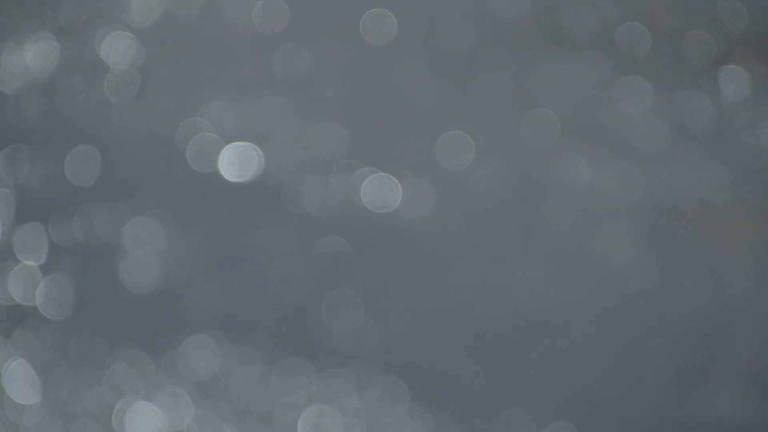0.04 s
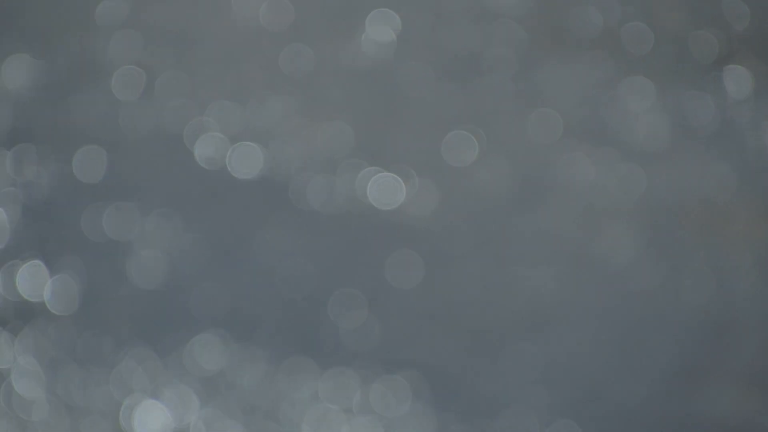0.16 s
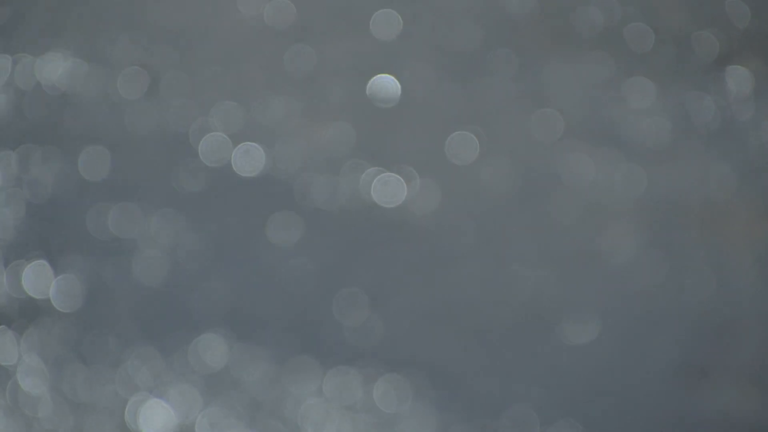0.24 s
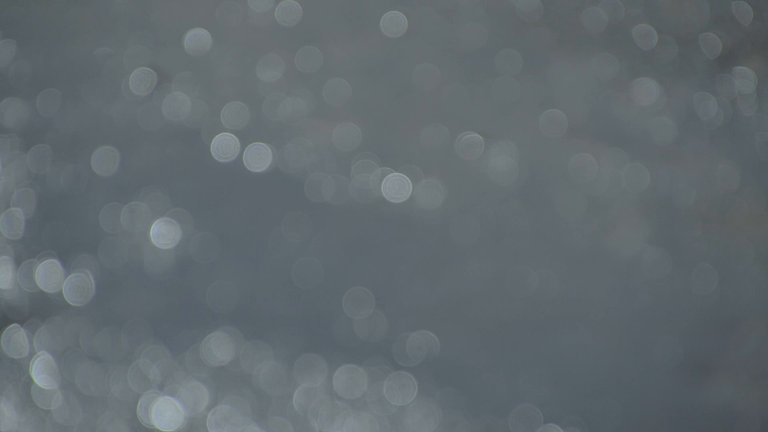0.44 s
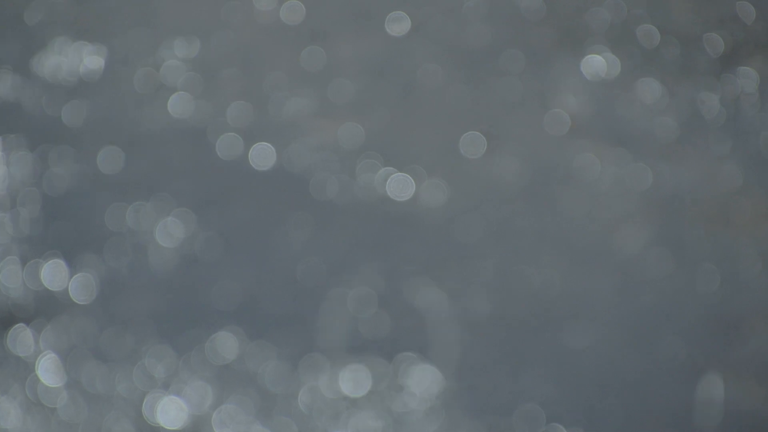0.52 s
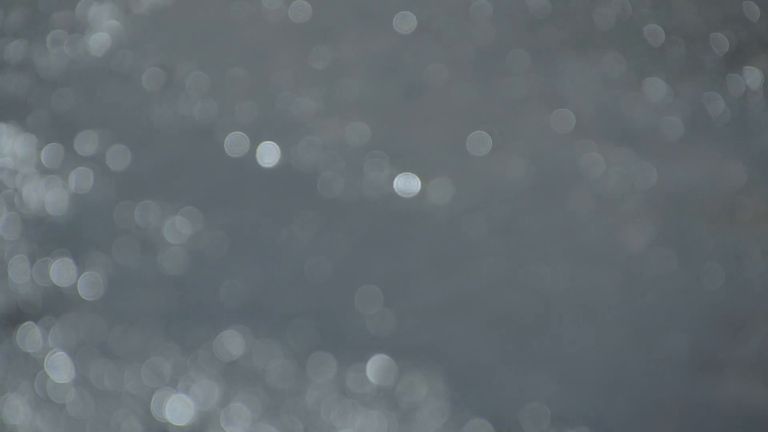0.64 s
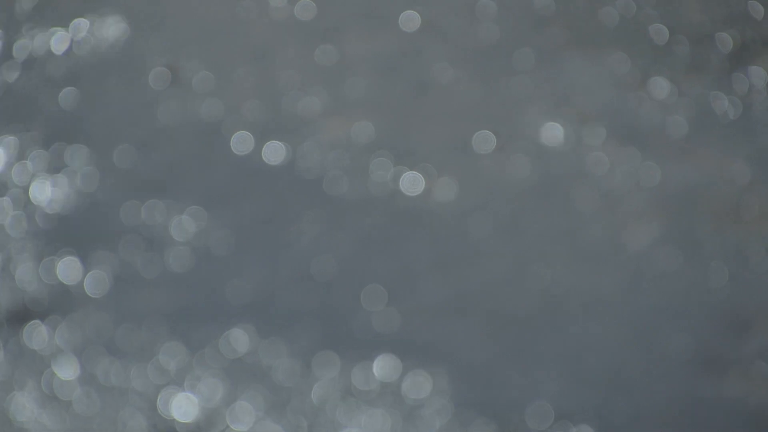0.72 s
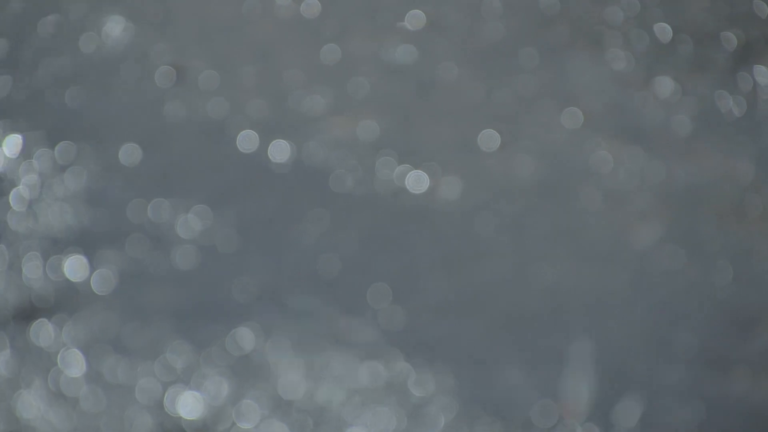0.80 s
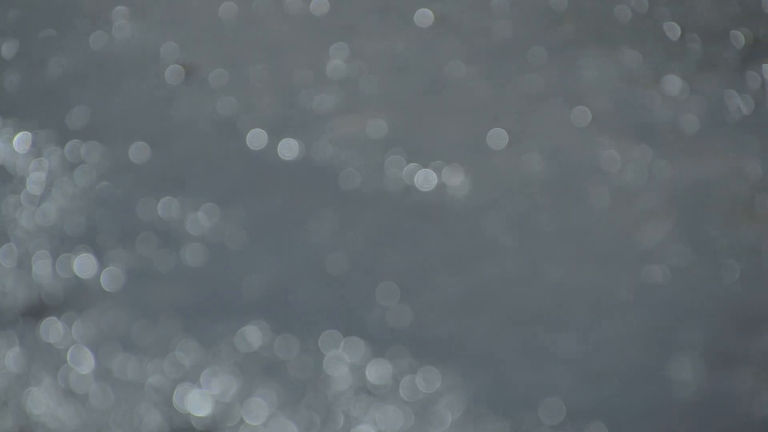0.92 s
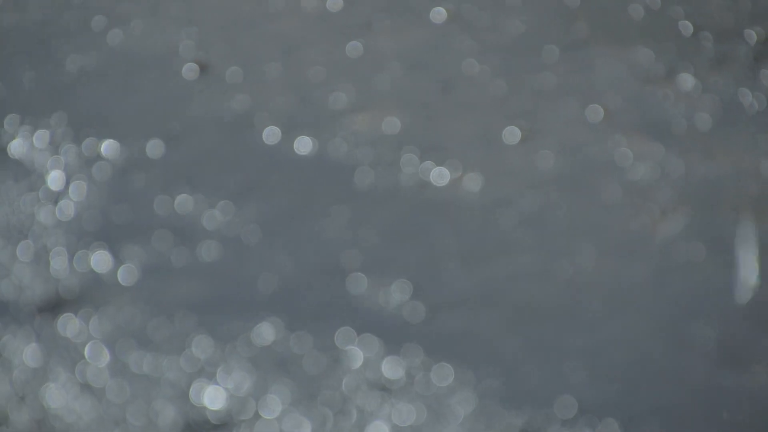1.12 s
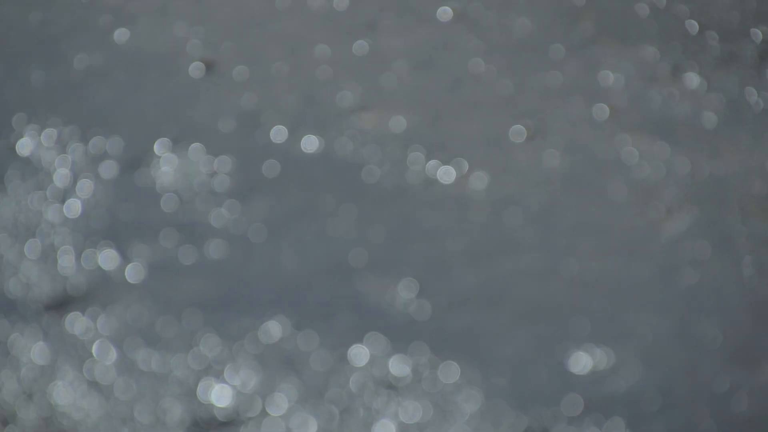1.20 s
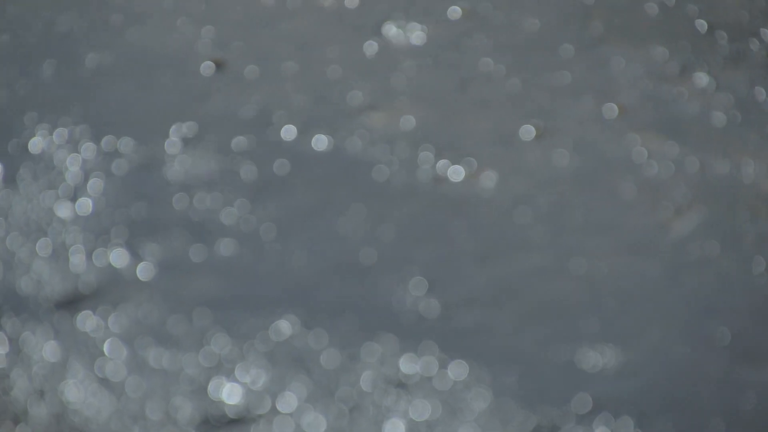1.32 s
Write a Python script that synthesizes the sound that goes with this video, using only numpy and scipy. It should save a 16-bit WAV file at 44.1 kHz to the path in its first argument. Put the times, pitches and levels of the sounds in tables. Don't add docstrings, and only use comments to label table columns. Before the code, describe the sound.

Meltwater drips close by outdoors: a loud bubbly plip with a hollow knock on the left, smaller drops and ticks, then a second loud knock with sharp spatter, over steady hiss and a faint bird, in close stereo.

```python
import sys
import numpy as np
from scipy import signal
from scipy.fft import rfft, irfft, next_fast_len
from scipy.io import wavfile
from scipy.ndimage import uniform_filter1d, map_coordinates

SR = 44100
rng = np.random.default_rng(int(sys.argv[2]) if len(sys.argv) > 2 else 0)


def field_ratio(decibels):
    return 10 ** (np.asarray(decibels, dtype=float) / 20)


def wrap_up_sound(samples):
    columns = np.atleast_2d(samples).T
    tamed = np.clip(columns, -1, 1)
    steps = np.round(tamed * 32767).astype(np.int16)
    wavfile.write(sys.argv[1], SR, steps)


N = 59535
RISE_PER_CYCLE = 0.007


def unit(x):
    return x / np.sqrt(np.mean(x ** 2) + 1e-20)


def along(points, hz):
    f, v = np.transpose(points)
    return np.interp(np.log(hz + 1), np.log(f + 1), v)


def filtered(x, response):
    n = x.shape[-1]
    m = next_fast_len(n + 4096)
    return irfft(rfft(x, m) * response(np.fft.rfftfreq(m, 1 / SR)), m)[..., :n]


def add(out, start_s, sound, left_db):
    lag_s_per_db = 0.000008
    stereo = np.broadcast_to(sound, (2, sound.shape[-1]))
    for port, side in enumerate((1, -1)):
        lag_s = max(-side * left_db, 0) * lag_s_per_db
        part = out[port, round((start_s + lag_s) * SR):][:sound.shape[-1]]
        part += field_ratio(side * left_db / 2) * stereo[port, :len(part)]


def swell(hz, length_s, climb_hz):
    t = np.arange(int(length_s * SR)) / SR
    cycles = (hz + climb_hz * t / length_s / 2) * t
    return np.sin(np.pi * t / length_s) * np.sin(2 * np.pi * cycles)


def bubble(hz, t60_s, rise=0):
    attack_cycles = 2.2
    t = np.arange(int(t60_s * SR) + 8) / SR
    cycles = hz * t * (1 + rise * hz * t / 2 / (1 + rise * hz * t))
    shape = field_ratio(-60 * t / t60_s) * (1 - np.exp(-hz * t / attack_cycles))
    return shape / shape.max() * np.sin(2 * np.pi * cycles)


def near_plips():
    # start in seconds, peak in dB, pitch in Hz, length in seconds, left over right in dB.
    plip_rows = [(.2211, -16.5, 4750, .001, 14), (.2219, -16.5, 4900, .0012, 14),
                 (.2229, -15.5, 5200, .0019, 14), (.2243, -24, 5600, .0015, 14),
                 (.2259, -24, 5000, .002, 14), (.2283, -32, 5450, .0014, 12),
                 (.22118, -22, 4900, .001, -14), (.2221, -17.5, 4900, .0015, -14),
                 (.2241, -27, 5300, .0009, -14), (.2249, -24.5, 5450, .0015, -14),
                 (.2261, -26, 5000, .0017, -14), (.2279, -34, 5200, .0014, -12),
                 (.231, -36, 4900, .0018, -4), (.2335, -36, 5100, .003, 6), (.2383, -37, 4800, .0025, 2),
                 (.5621, -27, 3110, .002, -6), (.5639, -35, 2900, .0016, -6),
                 (.5648, -29.5, 3250, .0021, -6), (.5665, -37, 4300, .002, -6),
                 (.5667, -37, 2900, .003, -6), (.5679, -35, 3750, .0017, -6), (.5693, -38, 4800, .002, -6),
                 (.5694, -39, 3300, .0015, -6), (.5712, -42, 3800, .0015, -6), (.5732, -45, 4500, .002, -4),
                 (.7388, -22.5, 4300, .0021, 8), (.7409, -35, 3750, .0018, 6), (.7418, -40, 5300, .0015, 0),
                 (.7442, -40, 4950, .002, -4), (.7364, -40, 4300, .0016, 8), (.728, -47, 3600, .002, 0),
                 (.7428, -40, 4200, .0018, 8), (.173, -47, 1600, .004, 13)]
    out = np.zeros((2, N))
    for s, db, hz, length_s, left_db in plip_rows:
        climb_hz = RISE_PER_CYCLE * hz * hz * length_s
        add(out, s, field_ratio(db) * swell(hz, length_s, climb_hz), left_db)
    return out


def crust_knocks():
    # start in seconds, peak in dB, tuning ratio, crack level in dB.
    knock_rows = [
        (0.2259, -14.5, 1.06, -10),
        (0.3, -35.5, .98, 1.5),
        (.319, -28, 1.03, -31),
        (.327, -29, 1.03, -19),
        (0.7367, -34, 1.08, 2),
        (1.1572, -15, 1.01, -15.5),
        (1.151, -36, 1.6, -6),
        (.177, -40, .8, -8),
        (.19, -42, .75, -8),
    ]
    # pitch in Hz, level in dB, 60 dB fade in seconds.
    crust_modes = [(800, -11, 0.065), (1166, 3.5, 0.034), (1300, -9, 0.045), (1556, -34, 0.12),
                   (2150, -12.5, 0.014), (480, -26, 0.044)]
    right_lag_s, ring_attack_s, crack_t60_s = 0.00039, 0.0013, 0.017
    out, t = np.zeros((2, N)), np.arange(SR // 8) / SR
    late = np.clip(t - np.array([[0], [right_lag_s]]), 0, None)
    for s, db, ratio, crack_db in knock_rows:
        ring = np.zeros((2, len(t)))
        for hz, level_db, t60_s in crust_modes:
            fade = field_ratio(level_db + rng.normal(0, 1) - 60 * late / t60_s)
            ring += fade * np.sin(2 * np.pi * hz * ratio * late)
        ring *= 1 - np.exp(-late / ring_attack_s)
        noise = rng.standard_normal((2, len(t)))
        crack = unit(filtered(noise, lambda f: f / 900 / (1 + (f / 2200) ** 3)))
        crack *= field_ratio(crack_db - 60 * t / crack_t60_s)
        add(out, s, field_ratio(db - 6) * (ring + crack), left_db=9)
    return out


def splats():
    # start in seconds, peak in dB, centre in Hz, 60 dB fade in seconds, left over right in dB.
    splat_rows = [(0.0164, -49.5, 9000, 0.11, -1), (0.142, -53, 13500, 0.19, 0),
                  (0.2206, -37, 13000, 0.039, -2.5), (.296, -36.5, 7000, 0.043, 7.5),
                  (0.3152, -37, 6940, 0.049, -4), (0.4679, -47.5, 7400, 0.17, -0.5),
                  (0.5049, -42, 6940, 0.03, 3), (0.5645, -41, 4600, 0.055, -2),
                  (0.6208, -48, 5240, 0.079, -2), (0.7387, -36.5, 11600, 0.024, -9),
                  (0.9236, -50.5, 9500, 0.099, -5.5), (1.0122, -40, 7500, 0.02, -1),
                  (1.0147, -38, 8000, 0.03, -1), (1.0222, -47, 8700, 0.16, -0.5),
                  (1.1272, -50, 9700, 0.018, -18), (1.1453, -43, 4000, 0.045, 8),
                  (1.1448, -41, 12000, .03, -4), (1.1493, -31.5, 12900, 0.041, -4),
                  (1.1563, -39.5, 4560, 0.015, 17), (1.211, -49, 9000, 0.02, -10),
                  (1.294, -65, 9700, 0.034, 6), (1.296, -31, 8150, 0.031, -4)]
    width_octaves, lumps_db, attack_s = 0.41, 3.5, 0.00036
    out, t = np.zeros((2, N)), np.arange(SR // 8) / SR
    for s, db, hz, t60_s, left_db in splat_rows:
        noise = rng.standard_normal((3, len(t)))
        spray = noise[:2] + 1.6 * noise[2]
        spray = filtered(spray, lambda f: np.exp(-(np.log2((f + 1) / hz) / width_octaves) ** 2 / 2))
        lumps = field_ratio(lumps_db * unit(uniform_filter1d(rng.standard_normal(len(t)), size=40)))
        shape = field_ratio(-60 * t / t60_s) * (1 - np.exp(-t / attack_s))
        burst = unit(shape * spray * lumps) * np.sqrt(np.mean(shape ** 2))
        add(out, s, field_ratio(db - 4.5) * burst, left_db)
    return out


def snaps():
    # start in seconds, peak in dB, pitch in Hz, left over right in dB.
    snap_rows = [(.0144, -47, 7620, -1), (.2962, -41, 7360, 1), (.3162, -40, 7490, 0),
                 (.4673, -46, 7260, 0), (.5057, -45, 6620, -1.5), (1.0127, -30, 7800, -.5),
                 (1.0147, -27, 7500, -.5), (1.018, -37, 8000, 0), (1.0224, -40, 8000, 0),
                 (1.0254, -42, 9500, 0), (1.0305, -39, 9500, 0), (1.0434, -40, 8500, 0),
                 (1.1263, -39, 9550, -5), (1.1466, -38, 12000, -4), (1.1517, -33, 11000, -4),
                 (1.2106, -44, 8290, -1.5), (1.297, -33, 9470, -3.5)]
    out = np.zeros((2, N))
    for s, db, hz, left_db in snap_rows:
        add(out, s, field_ratio(db - 1) * bubble(hz, 5 / hz), left_db)
    return out


def ticks():
    # start in seconds, peak in dB, pitch in Hz, left over right in dB.
    tick_rows = [(.217, -48, 2260, -2), (.086, -50, 1503, -14.5), (.0855, -49, 2220, -12),
                 (.535, -53.5, 1930, 13), (.5447, -47, 4660, -6), (.554, -47.5, 2150, 5),
                 (.611, -57, 1587, -14), (.6943, -48, 4040, -8.5), (.7896, -50.5, 5400, -14),
                 (.804, -51, 1503, -10.5), (1.0755, -53, 3190, -12), (1.115, -50.5, 2100, -9),
                 (1.1134, -50, 4630, -16), (1.308, -52, 2180, -12), (1.3334, -46.5, 7200, -4),
                 (.2355, -41, 10200, -9), (.296, -36.5, 4600, 8), (.2222, -36.5, 14650, 19),
                 (1.0136, -42.5, 3990, 3), (1.15, -23, 11070, -7)]
    fade_cycles, longest_s = 51, 0.037
    out = np.zeros((2, N))
    for s, db, hz, left_db in tick_rows:
        add(out, s, field_ratio(db) * bubble(hz, min(fade_cycles / hz, longest_s)), left_db)
    return out


def glugs():
    # start in seconds, peak in dB, pitch in Hz, length in seconds, climb in Hz.
    glug_rows = [
        (.149, -47, 1090, .013, -170),
        (.205, -49, 1850, .017, 450),
        (.902, -53, 1180, .016, 500),
        (.914, -55, 2000, .012, 500),
        (.848, -56, 1600, .012, 450),
    ]
    out = np.zeros((2, N))
    for s, db, hz, length_s, climb_hz in glug_rows:
        add(out, s, field_ratio(db) * swell(hz, length_s, climb_hz), left_db=1)
    return out


def far_drips():
    drops_per_s, typical_hz, pitch_spread, top_hz = 290, 5000, 0.6, 14500
    level_db, size_db, fade_cycles = -62, 3.5, 17.7
    out = np.zeros((2, N))
    for _ in range(int(drops_per_s * N / SR)):
        when, size = rng.random(2)
        pitch, side = rng.standard_normal(2)
        hz = min(typical_hz * np.exp(pitch_spread * pitch), top_hz)
        db = level_db - size_db * np.log(size + 0.044)
        add(out, when * N / SR, field_ratio(db) * bubble(hz, fade_cycles / hz, RISE_PER_CYCLE), 5 * side)
    return out


def ice_faces(drops):
    level_db, t60_s, top_hz, first_echo_s = -16, 0.056, 7000, 0.003
    t = np.arange(SR // 20) / SR
    echoes = rng.standard_normal((2, len(t))) ** 3
    echoes *= field_ratio(-60 * t / t60_s) * (t > first_echo_s)
    echoes /= np.linalg.norm(echoes, axis=1)[:, None]
    copies = signal.fftconvolve(drops, echoes, axes=1)[:, :N]
    return field_ratio(level_db) * filtered(copies, lambda f: 1 / (1 + (f / top_hz) ** 4))


def bird():
    # start in seconds, length in seconds, level in dB, pitch in Hz, glide in Hz.
    note_rows = [(0.128, 0.055, -61, 4470, -100), (0.155, 0.044, -63, 4030, -150),
                 (0.184, 0.035, -58.5, 3430, -250), (0.238, 0.03, -57, 4000, -350),
                 (0.266, 0.042, -52, 3520, -80), (0.296, 0.021, -53.5, 2990, -100),
                 (.308, .03, -60, 2950, -50), (.322, .055, -66, 3560, -30), (.886, .025, -66, 3450, -100),
                 (.936, .014, -63, 3120, 0), (.988, .025, -71, 3850, 100), (0.87, 0.03, -61, 4124, 44),
                 (0.89, .02, -64, 4570, 0), (0.904, 0.048, -63, 3800, -9), (0.915, 0.011, -63, 3700, -40),
                 (0.925, 0.06, -57, 3427, -15), (0.967, 0.056, -63.5, 2404, 498),
                 (0.969, 0.043, -71.5, 1244, -2), (1.181, 0.015, -65.5, 3580, -4),
                 (1.189, 0.035, -58, 3300, -700), (1.3, 0.016, -75, 3550, 0)]
    burr_hz, burr_depth, quaver_hz = 400, 0.9, 120
    wet_db, t60_s = -1, 0.18
    out = np.zeros((2, N))
    for s, length_s, db, hz, glide_hz in note_rows:
        t = np.arange(int(length_s * SR)) / SR
        wobble = uniform_filter1d(rng.standard_normal((2, 4000)), size=int(SR / burr_hz))
        burr, quaver = unit(wobble)[:, :len(t)]
        pitch = hz + glide_hz * t / length_s + quaver_hz * quaver
        tone = np.sin(2 * np.pi * np.cumsum(pitch) / SR)
        shape = np.sin(np.pi * t / length_s) ** 0.5 * (1 + burr_depth * burr)
        add(out, s, field_ratio(db + 6.5) * shape * tone, left_db=1)
    t = np.arange(SR // 3) / SR
    tail = rng.standard_normal((2, len(t))) * field_ratio(-60 * t / t60_s)
    trees = signal.fftconvolve(out, tail / np.linalg.norm(tail[0]), axes=1)[:, :N]
    return out + field_ratio(wet_db) * trees


def rush(spectrum, alike, patchy_db):
    z = signal.stft(rng.standard_normal((2, N)), nperseg=512)[2]
    patches = uniform_filter1d(rng.standard_normal(z.shape[1:]), size=6, axis=0)
    patches = uniform_filter1d(patches, size=8, axis=1)
    pair = signal.istft(z * field_ratio(patchy_db * unit(patches)), nperseg=512)[1][:, :N]

    def mid_and_side(hz):
        turn = np.arccos(np.clip(along(alike, hz), -1, 1)) / 2
        return field_ratio(along(spectrum, hz)) * np.array([np.cos(turn), np.sin(turn)])

    mid, side = filtered(pair, mid_and_side)
    return unit(np.array([mid + side, mid - side]))


def hiss():
    # frequency in Hz, level in dB per Hz.
    hiss_spectrum = [(150, 0.5), (250, 0), (1100, -3), (2090, -1.5), (2760, -6.5), (4900, -2.5),
                     (11100, -12), (15200, -16.5), (16000, -8.5)]
    # frequency in Hz, likeness of left and right (1 is the same).
    hiss_alike = [(110, .9), (250, 0.25), (700, 0.71), (2000, 0.21), (6000, 0.34), (15000, 0.3)]
    return field_ratio(-55.5) * rush(hiss_spectrum, hiss_alike, patchy_db=3.0)


def breeze():
    # frequency in Hz, level in dB per Hz.
    rumble_spectrum = [(12, -22), (40, 1.5), (62, 0), (120, 0.5), (264, -9.5), (400, -20), (600, -45)]
    # time of the puff in seconds, peak in dB.
    puff_rows = [(.008, -54.5), (0.074, -53), (0.099, -57.5), (0.148, -48), (0.186, -47), (0.218, -51),
                 (.255, -50.5), (0.601, -67.5), (0.777, -58), (1.268, -77), (1.298, -67)]
    level_db, puff_s = -66, 0.034
    t = np.arange(N) / SR
    sway = map_coordinates(rng.standard_normal(60), [t * 40])
    strength = field_ratio(level_db + 1.1 * sway)
    for s, db in puff_rows:
        strength += field_ratio(db) * np.exp(-((t - s) / puff_s * 3) ** 2)
    return strength * rush(rumble_spectrum, [(110, 0.998), (300, 0.86)], patchy_db=0.4)


def scene():
    drops = near_plips() + snaps() + ticks() + glugs() + far_drips()
    return drops + ice_faces(drops) + crust_knocks() + splats() + bird() + hiss() + breeze()


def roll_off(x):
    return signal.sosfilt(signal.butter(12, 16780, fs=SR, output="sos"), x)


def record(dry):
    top_hz = 15900
    mix = filtered(dry, lambda hz: 1 / (1 + (hz / top_hz) ** 90))
    return roll_off(mix)


dry = scene()
out = record(dry)
wrap_up_sound(out)
```